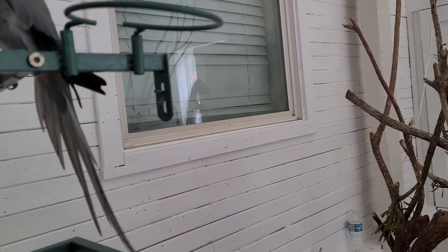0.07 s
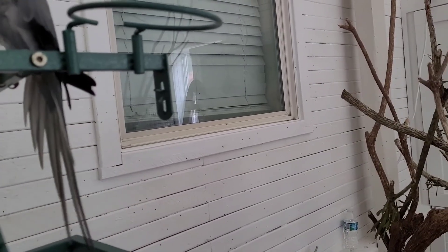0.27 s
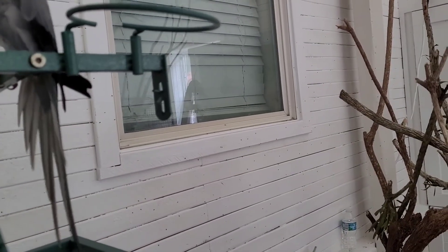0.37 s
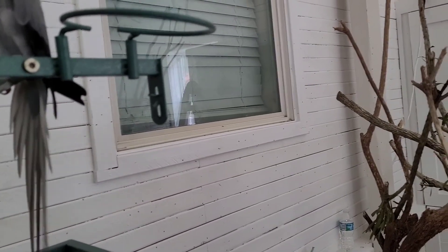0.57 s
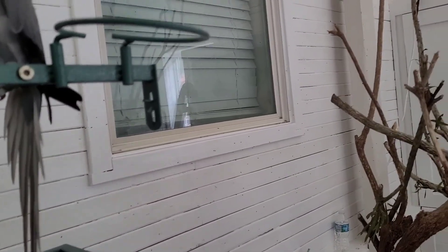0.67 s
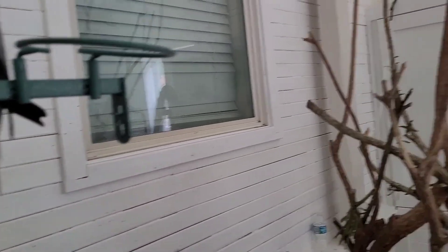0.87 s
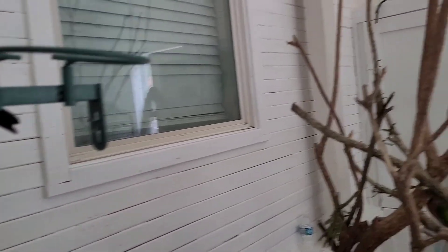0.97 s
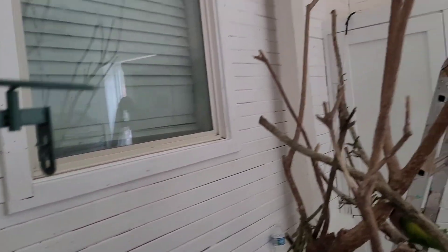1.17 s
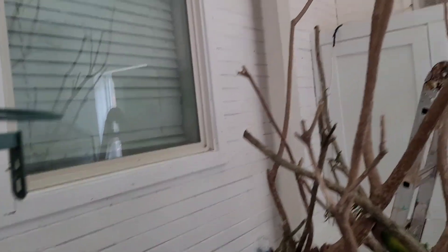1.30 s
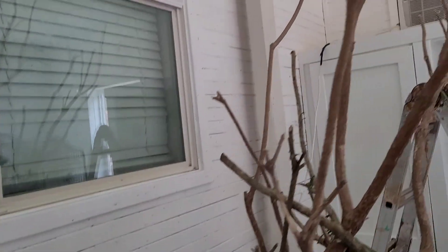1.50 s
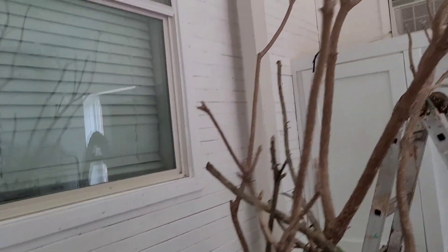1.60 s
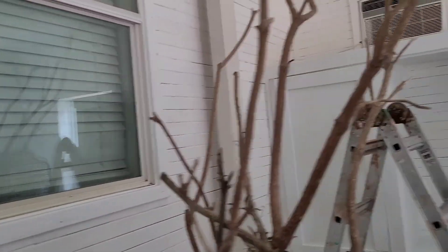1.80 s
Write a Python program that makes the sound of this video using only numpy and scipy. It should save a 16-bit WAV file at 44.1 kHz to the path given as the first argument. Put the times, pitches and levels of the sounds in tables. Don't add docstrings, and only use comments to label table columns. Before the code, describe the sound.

Parrots call in a bare echoing room: a dipping whistle snapping high, then two rising squawks

```python
import sys
import numpy as np
from scipy import signal
from scipy.fft import rfft, irfft
from scipy.io import wavfile
from scipy.ndimage import uniform_filter1d, minimum_filter1d

SR = 44100
rng = np.random.default_rng(int(sys.argv[2]) if len(sys.argv) > 2 else 0)


def ratio(d):
    e = np.asarray(d, float) / 20
    return 10 ** e


def log_audio(samples):
    frames = np.atleast_2d(samples).T
    limited = np.clip(frames, -1, 1)
    pcm = np.round(limited * 32767).astype(np.int16)
    wavfile.write(sys.argv[1], SR, pcm)


N = 81585

# (time [s], pitch [Hz], level [dB], brightness [dB per
WHISTLE_GLIDE = [
    (.188, 1656, -27.5, -6.5),
    (.225, 1389, -22.5, -0.5),
    (.262, 1151, -19.5, -1.5),
    (.278, 1100, -14.5, -2),
    (.3, 1045, -19.5, -7.5),
    (.33, 1098, -28.5, -6),
    (.404, 1468, -24.5, -2.4),
    (.446, 1652, -19, -8),
                 (.462, 1770, -29, -5),
    (0.48, 2094, -23.5, -3),
    (0.488, 2264, -21, -5.5),
    (0.496, 2597, -20, 5),
]
SNAP = [
    (0.498, 3108, -14, -0.04),
    (0.51, 3262, -14.5, 0.071),
    (0.527, 3382, -15.5, -1.5),
    (0.548, 3342, -21, 0.017),
]
# (centre [Hz], width [Hz], level [dB])
WHISTLE_PIPE = [(1100, 330, -34.5), (2420, 320, -2), (3134, 984, 3.5), (5120, 770, -7), (6440, 1500, -10),
                (8250, 2200, -10.5), (10780, 4700, -18.5)]
# (frequency [Hz], difference [dB])
WHISTLE_LEAN = [(60, -6.5), (240, 3.0), (950, 5), (3770, 15.5), (15000, 14.5)]


def dipping_whistle():
    return bird([WHISTLE_GLIDE, SNAP], WHISTLE_PIPE, WHISTLE_LEAN, delay_ms=-0.832, room_db=-2.74, rasp_db=2.5)


# (time [s], pitch [Hz], level [dB], brightness [dB per octave])
ARCH_GLIDE = [
    (.742, 521.7, -56.5, -9),
    (.78, 696, -44, -17.5),
    (.801, 856.5, -27.5, -7.5),
    (.813, 1053, -20.5, -3.5),
    (.829, 1486, -15.5, 4),
    (.841, 1587, -12, 0),
    (.852, 1673, -17.5, 4.5),
    (.864, 1719, -17.5, 2),
    (.877, 1710, -24.5, -1.5),
              (.884, 1633, -21, -3.5),
    (.889, 1559, -12, -4),
    (.898, 1374, -31.5, -4),
    (.912, 1140, -27.5, -4.5),
    (.932, 990, -33, -6),
    (0.958, 830, -42, -13),
    (1.007, 680, -39, -11.5),
    (1.064, 556.5, -51.5, -8),
]
# (centre [Hz], width [Hz], level [dB])
ARCH_PIPE = [(833, 158, -19), (1326, 360, -13), (2330, 740, 1), (3073, 680, 7), (4930, 790, -4.5),
             (6940, 2800, -11.5), (8530, 330, -7), (10660, 2330, -16.5)]
# (frequency [Hz], difference [dB])
ARCH_LEAN = [(60, 3.5), (240, 6.8), (950, 9.2), (3770, 17.7), (15000, 10.4)]


def arched_squawk():
    return bird([ARCH_GLIDE], ARCH_PIPE, ARCH_LEAN, delay_ms=-0.488, room_db=-4, rasp_db=0.5)


# (time [s], pitch [Hz], level [dB], brightness [dB per
CLIMB_GLIDE = [
    (1.414, 439, -65, -1.3),
    (1.452, 593.5, -41, -0.27),
    (1.474, 737.5, -30, -0.062),
    (1.492, 862.5, -22.5, 1),
    (1.52, 985.5, -23.5, -0.5),
    (1.53, 1096, -19.5, -1.8),
    (1.564, 1255, -23, -0.91),
    (1.579, 1325, -19.5, -0.18),
               (1.582, 1422, -32, 5),
    (1.588, 1680, -26.5, -15),
    (1.623, 1612, -33.5, -7),
    (1.645, 1272, -33, -19),
    (1.671, 888.3, -37.5, -6.5),
    (1.689, 779, -32.5, -2),
    (1.706, 583, -62, -17),
]
# (centre [Hz], width [Hz], level [dB])
CLIMB_PIPE = [(830, 900, -2), (1550, 420, 7.5), (2450, 1020, 7.5), (3520, 600, -6.5), (4760, 810, -6),
              (5500, 460, -11.5), (7160, 2230, -14), (10360, 2000, -23), (13900, 1800, -31)]
# (frequency [Hz], difference [dB])
CLIMB_LEAN = [(500, 1), (1000, 2.3), (2500, 4), (6000, 15.6), (12000, 4.8)]


def climbing_squawk():
    return bird([CLIMB_GLIDE], CLIMB_PIPE, CLIMB_LEAN, delay_ms=-0.505, room_db=-3)


def bird(curves, pipe, lean, delay_ms, room_db, rasp_db=0.):
    dry = np.zeros((2, N))
    for curve in curves:
        add(dry, curve[0][0], call(curve, pipe, lean, delay_ms, rasp_db))
    treble = signal.sosfiltfilt(signal.butter(2, 5500, "high", fs=SR, output="sos"), dry)
    return dry - 0.3 * treble + ratio(room_db) * room(dry)


def call(curve, pipe, lean, delay_ms, rasp_db):
    s, pitch, level_db, bright_db = np.transpose(sorted(curve))
    t = np.arange(s[0], s[-1], 1 / SR)
    glide = uniform_filter1d(np.interp(t, s, pitch), size=161, mode="nearest")
    hz = glide * (1 + 0.0036 * drift(len(t), 90))
    phase = 2 * np.pi * np.cumsum(hz) / SR
    k = np.arange(1, 25)[:, None]
    line_hz = k * hz

    brightness = ratio(np.interp(t, s, bright_db) * np.log2(k))
    heights = tract(pipe, line_hz) * brightness * (line_hz < 16000)
    heights = heights / np.sqrt((heights ** 2).sum(0) / 2)

    octaves = np.maximum(np.log2(line_hz / 3000), 0)
    breath = ratio(-24 + rasp_db + 6 * octaves) * drift((2,) + heights.shape, 30)
    coarse = drift((2, len(k), len(t) // 100 + 2), 7).repeat(100, 2)[..., :len(t)]
    patches = ratio((1.2 + 2.6 * octaves) * uniform_filter1d(coarse, size=200))

    side = ratio(read(lean, line_hz) / 2)
    slip = np.pi * line_hz * delay_ms / 1000 * np.minimum(line_hz / 1273, 1)
    ears = []
    for gain, shift in ((side * patches[0], -slip), (patches[1] / side, slip)):
        tone = (1 + breath[0]) * np.sin(k * phase + shift)
        rasp = breath[1] * np.cos(k * phase + shift)
        ears.append((heights * gain * (tone + rasp)).sum(0))

    onset_s, flutter_db = 0.0025, 1
    edge = np.sin(np.pi / 2 * np.clip(np.minimum(t - s[0], s[-1] - t) / onset_s, 0, 1)) ** 2
    return np.array(ears) * edge * ratio(np.interp(t, s, level_db) + flutter_db * drift(len(t), 150))


def tract(pipe, hz):
    return np.sqrt(sum((ratio(db) / (1 + (2 * (hz - f) / width) ** 2)) ** 2 for f, width, db in pipe))


# (time [s], length [s], level [dB], left minus right [dB])
PUFFS = [
    (0.445, 0.073, -28.5, 3),
    (0.794, 0.038, -36, 4),
    (1.445, 0.051, -48.5, 4),
]
# (frequency [Hz], level [dB per Hz])
PUFF_AIR = [(1500, -38), (3000, -7), (6000, -5), (8300, -4.5), (11000, -8), (14500, -13.5)]


def puffs():
    air = noise(PUFF_AIR, [(2000, .8), (9000, 0.51)])
    dry = np.zeros((2, N))
    for s, length, db, pan_db in PUFFS:
        part = air[:, round(s * SR):round((s + length) * SR)]
        add(dry, s, part * np.hanning(part.shape[1]) * pan(db, pan_db))
    return dry + ratio(2.0) * room(dry)


# (delay [ms], left level [dB], right level [dB])
WALLS = [(2.22, -9.5, -2), (4.97, -12.5, 1.5), (9.61, -9.5, -15.5), (14.54, -22.5, -0.5),
         (21.5, -19.5, -20), (29.73, -32, -7)]
# (frequency [Hz], time to fall 60 dB [s])
ROOM = [(300, 0.5), (1000, 0.69), (2500, 0.66), (4000, 0.66), (8000, 0.55), (14000, 0.34)]


def room(x):
    taps = np.zeros((2, SR))
    at = np.arange(0, SR - 12, 12) + rng.integers(0, 12, (2, (SR - 1) // 12))
    np.put_along_axis(taps, at, rng.choice([-1., 1.], at.shape), 1)
    hz, t, z = signal.stft(taps, SR, nperseg=256)
    decay = ratio(-60 * t / read(ROOM, hz)[:, None])
    tail = signal.istft(z * decay, SR, nperseg=256)[1][:, :SR]
    start_s, build_s = 0.0051, 0.02
    tail = tail * np.clip((np.arange(SR) / SR - start_s) / build_s, 0, 1)
    tail = tail / np.linalg.norm(tail[0])
    for ms, left_db, right_db in WALLS:
        at = round(ms * SR / 1000)
        tail[0, at] += ratio(left_db)
        tail[1, at + rng.integers(-25, 25)] += ratio(right_db)
    return signal.fftconvolve(x.mean(0)[None], tail, axes=1)[:, :N]


# (time [s], pitch [Hz], level [dB], brightness [dB per octave])
SQUEAK = [
    (.512, 5600, -30, -10.5),
    (.535, 5820, -35, -9),
    (.565, 5490, -37.5, -10.5),
    (.6, 5650, -33.5, -10.5),
    (.63, 5800, -50.5, -17),
]
# (frequency [Hz], difference [dB])
SQUEAK_LEAN = [(5000, -2.5), (12000, -17)]


def far_squeak():
    return bird([SQUEAK], WHISTLE_PIPE, SQUEAK_LEAN, delay_ms=0.31, room_db=1.7, rasp_db=15)


# (frequency [Hz], level [dB per Hz])
EARLIER = [(530, -81.5), (900, -51), (1460, -11.5), (2010, -15.5), (2940, -3.5), (4240, -11), (5160, -22.5),
           (8070, -22), (14000, -54)]
# (centre [Hz], width [Hz], level [dB])
EARLIER_NOTES = [(2594, 37, -7), (2910, 120, -1.5), (3170, 92, -9), (4100, 44, -10), (8100, 400, -13.5)]


def earlier_call():
    notes = sum(ratio(db) * fuzzy(hz, width) for hz, width, db in EARLIER_NOTES)
    wash = noise(EARLIER, [(1000, .2), (9000, .1)]) + ratio(0.5) * evened(notes)
    return ratio(-33.5 - 90 * np.arange(N) / SR) * evened(wash)


# (time [s], peak level [dB], ring [Hz], left minus right [dB])
TICKS = [
    (0.0296, -34.5, 11600, 4.5),
    (0.097, -29, 6600, 9.5),
]


def ticks():
    dry, t = np.zeros((2, N)), np.arange(300) / SR
    for s, db, hz, pan_db in TICKS:
        ring = 0.34 * np.sin(2 * np.pi * hz * t)
        scratch = 0.33 * np.diff(rng.standard_normal(301))
        snap = (ring + scratch) * ratio(db - 60 * t / 0.01)
        add(dry, s, snap * pan(0, pan_db))
    return dry + ratio(-12.0) * room(dry)


# (centre [Hz], width [Hz], level [dB])
HUM = [(46, 14, -68), (70, 14, -60.5), (105.4, 6, -70.5), (142.3, 10, -70), (239.3, 23, -66),
       (275, 50, -64.5), (330.6, 13, -65)]


def hum():
    lines = sum(ratio(db) * fuzzy(hz, width) for hz, width, db in HUM)
    steady = ratio(-54) * np.sin(2 * np.pi * 68 * np.arange(N) / SR)
    spread = ratio(-8) * np.array([lines[1], -lines[1]])
    return steady + lines[0] + spread


# (frequency [Hz], level [dB per Hz])
AIR = [(12, -62.5), (20, -13.5), (59, -10.5), (319, -2), (914, -12), (3270, -37), (3970, -32),
       (11700, -20.5), (15000, -43.5)]
# (frequency [Hz], correlation [0 to 1])
AIR_SAME = [(30, .75), (150, .7), (600, 0.52), (3000, .1)]


def room_air():
    return ratio(-62) * noise(AIR, AIR_SAME)


def noise(spectrum, same):
    hz = np.fft.rfftfreq(N, 1 / SR)
    a, b = rfft(rng.standard_normal((2, N)))
    c = np.clip(read(same, hz), -1, 1)
    pair = np.array([a, c * a + np.sqrt(1 - c ** 2) * b])
    return evened(irfft(pair * ratio(read(spectrum, hz)), N))


def fuzzy(hz, width):
    f = np.fft.rfftfreq(N, 1 / SR)
    return evened(irfft(rfft(rng.standard_normal((2, N))) / (1 + (2 * (f - hz) / width) ** 2), N))


def drift(size, span):
    return evened(uniform_filter1d(uniform_filter1d(rng.standard_normal(size), span), span))


def evened(x):
    return x / np.sqrt(np.mean(x ** 2) + 1e-20)


def read(points, hz):
    f, value = np.transpose(points)
    return np.interp(np.log(hz + 1), np.log(f + 1), value)


def pan(db, pan_db):
    return ratio(db + np.array([[pan_db / 2], [-pan_db / 2]]))


def add(mix, s, sound):
    part = mix[:, max(round(s * SR), 0):][:, :sound.shape[1]]
    part += sound[:, :part.shape[1]]


def scene():
    near = dipping_whistle() + arched_squawk() + climbing_squawk() + puffs()
    return near + far_squeak() + earlier_call() + ticks() + hum() + room_air()


def band_limit(x):
    return signal.sosfilt(signal.butter(12, 15690, fs=SR, output="sos"), x)


def record(dry):
    x = signal.sosfiltfilt(signal.butter(10, 14800, fs=SR, output="sos"), dry)
    ceiling = 0.97
    gain = minimum_filter1d(ceiling / np.maximum(abs(x).max(0), ceiling), size=301)
    mix = x * uniform_filter1d(gain, size=151)
    return band_limit(mix)


dry = scene()
out = record(dry)
log_audio(out)
```